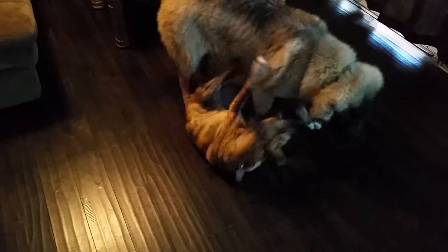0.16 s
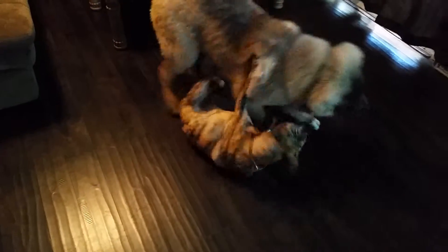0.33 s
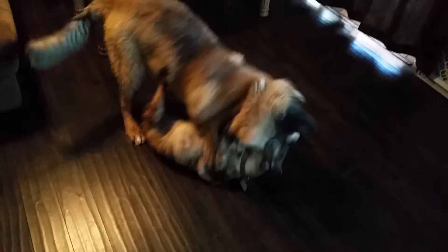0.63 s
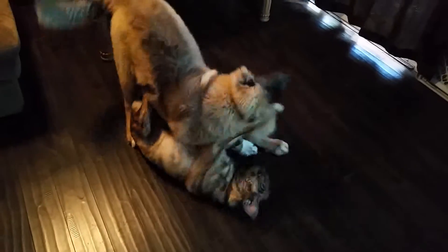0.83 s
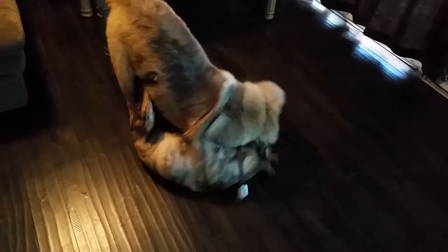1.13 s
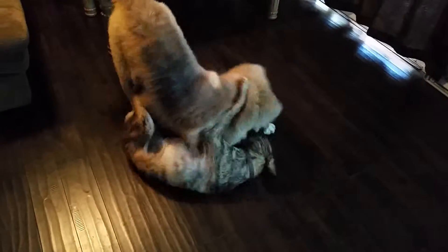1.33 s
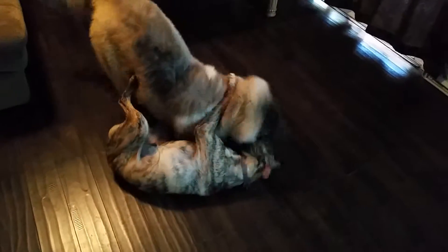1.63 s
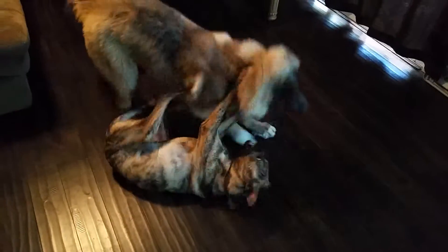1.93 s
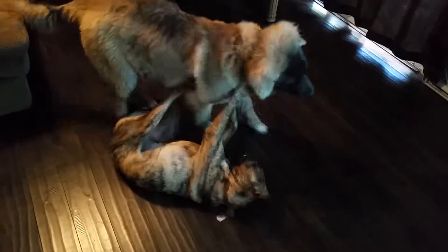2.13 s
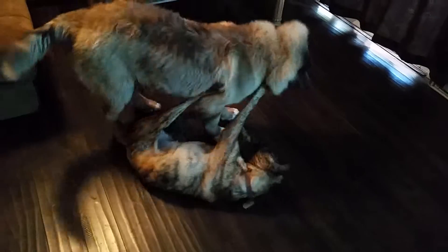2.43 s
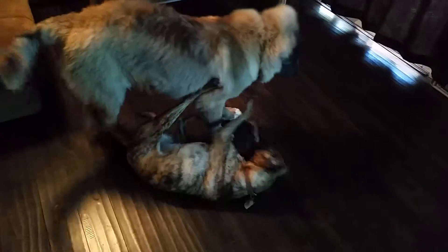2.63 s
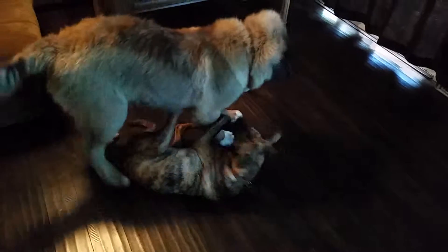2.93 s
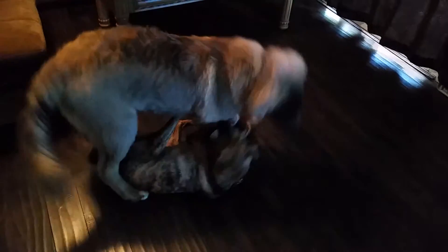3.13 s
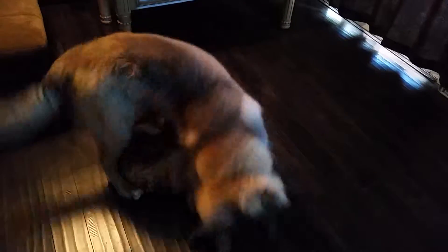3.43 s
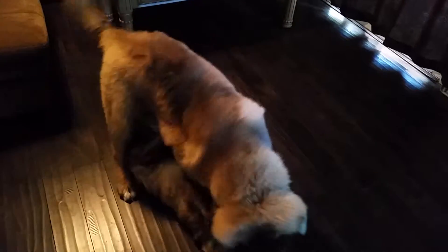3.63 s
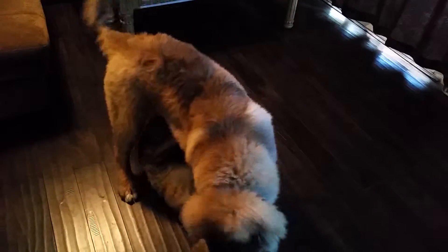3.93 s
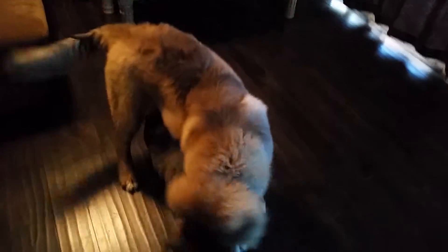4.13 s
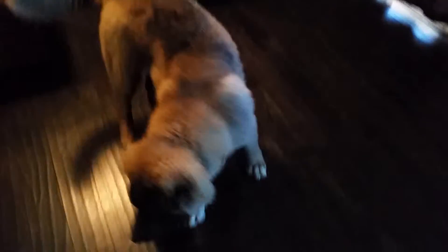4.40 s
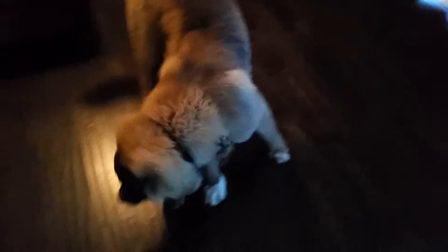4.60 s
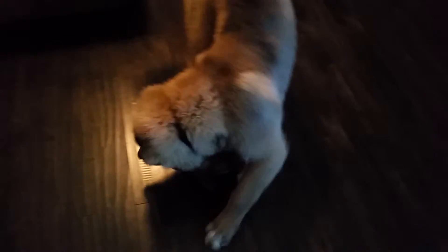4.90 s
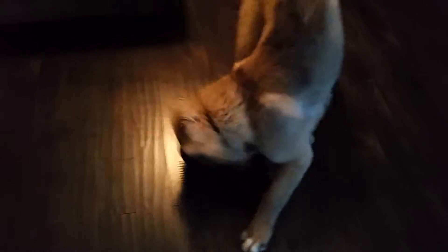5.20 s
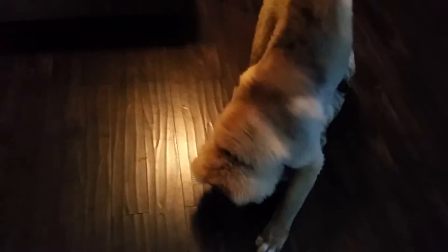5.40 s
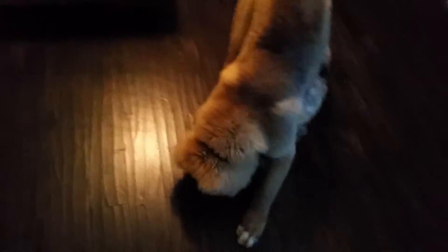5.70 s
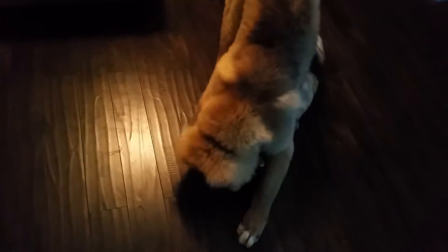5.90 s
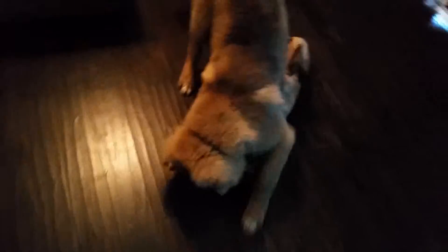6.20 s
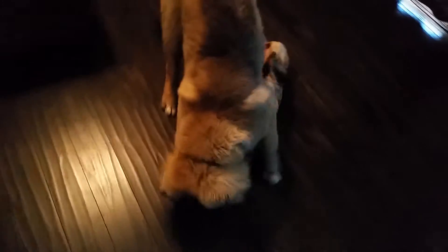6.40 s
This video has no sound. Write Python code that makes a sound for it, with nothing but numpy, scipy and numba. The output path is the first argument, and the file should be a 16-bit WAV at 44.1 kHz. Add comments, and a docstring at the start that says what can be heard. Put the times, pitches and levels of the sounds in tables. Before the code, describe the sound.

Close, throaty play growls and short grunts from scuffling dogs, with bright tag jingles, claw scrapes and soft body thumps on indoor floorboards.

```python
"""A metal collar tag jingles and claws tick, then rough growls and a grunt break out: two puppies wrestle on
a wooden floor in a living room, a metre or two from a hand-held phone. The voice is source and filter: uneven
pulses of the vocal folds ring chest, throat, a moving mouth and muzzle. The tag is a sum of decaying modes;
claws and bodies are short noise bursts that ring planks and boards. Room reflections, air and a low mains hum
surround them."""
import sys
import numpy as np
from scipy import signal
from scipy.fft import rfft, irfft
from scipy.io import wavfile
from scipy.ndimage import uniform_filter1d, map_coordinates
from numba import njit

SR = 44100
rng = np.random.default_rng(int(sys.argv[2]) if len(sys.argv) > 2 else 0)


def master_out(mix):
    """Clip the mix to full scale and print it as 16-bit PCM to the path in sys.argv[1]."""
    frames = np.transpose(np.atleast_2d(mix))
    ceiling = np.clip(frames, -1, 1)
    pcm = np.round(ceiling * 32767).astype(np.int16)
    wavfile.write(sys.argv[1], SR, pcm)


N = 288855
T = np.arange(N) / SR
FREQ = np.arange(N + 1) * SR / (2 * N)

# Hard catches in the throat, where the folds burst open. Each row: time in seconds, strength in dB.
CATCHES = [(.292, 5), (.45, 4), (1.04, 3), (1.068, 3), (1.696, 2), (2.68, 5), (2.732, 4.5), (2.891, 4),
           (3.223, 6), (4.131, 3), (4.224, 3), (4.381, 5.5), (4.524, 4.5), (5.144, 6), (5.268, 6),
           (5.751, 5), (5.856, 3), (6.002, 3.5), (6.078, 3), (6.11, 4)]
# Spectrum of a bare, bright contact. Each row: frequency in Hz, level in dB.
BRIGHT_CONTACT = [(1500, 7), (4000, 10), (7000, 24.5), (8700, 14.5), (11000, 21.5), (14000, 19),
                  (16000, 25)]


def undb(db):
    """Level as a logarithmic ratio: decibels to amplitude gain."""
    return 10 ** (np.asarray(db) / 20)


def unit(x):
    """Normalisation of power: scale to rms 1."""
    return x / np.sqrt(np.mean(x ** 2) + 1e-18)


def pan(db):
    """Interaural level difference: gains for a left minus right difference in dB."""
    return undb(np.array([[db], [-db]]) / 2)


def add(track, s, x):
    """Superposition: mix x into track from time s on."""
    i = max(int(s * SR), 0)
    track[..., i:i + x.shape[-1]] += x[..., :N - i]


def on_log_axis(points, hz):
    """Interpolation on a logarithmic frequency axis: read (Hz, value) points at the given frequencies."""
    f, value = np.transpose(points)
    return np.interp(np.log(hz + 1), np.log(f), value)


def colour(x, points, tilt_db=0):
    """Minimum-phase filter by cepstral folding: the given spectrum, tilted in dB per octave about 2.9 kHz."""
    size = 2048
    hz = np.arange(size + 1) * SR / (2 * size)
    level_db = on_log_axis(points, hz) + tilt_db * np.log2((hz + 100) / 3000)
    cepstrum = irfft(np.log(undb(level_db)))
    # folding the cepstrum onto positive times makes the response causal
    cepstrum[1:size] *= 2
    cepstrum[size + 1:] = 0
    response = irfft(np.exp(rfft(cepstrum)))
    return signal.fftconvolve(x, response)[:len(x)]


@njit
def svf(x, hz, width):
    """State-variable resonator: a band-pass whose centre may move, gain 1 at the centre."""
    y, band, low = np.empty(len(x)), 0., 0.
    for i in range(len(x)):
        g, k = np.tan(np.pi * hz[i] / SR), width / hz[i]
        v = (band + g * (x[i] + 1e-18 - low)) / (1 + g * (g + k))
        band, low, y[i] = 2 * v - band, low + 2 * g * v, k * v
    return y


def resonate(x, modes, skirt=2.6):
    """Parallel modes of resonance; a second pass, skirt times as wide as the first, steepens the flanks."""
    flat = np.ones(len(x))
    total = 0
    for hz, width, db in modes:
        once = svf(x, hz * flat, 1. * width)
        total = total + undb(db) * svf(once, hz * flat, 1. * skirt * width)
    return total


def walk(rate, n):
    """Low-frequency random modulation: straight lines between Gaussian knots, rate knots a second."""
    knots = rng.standard_normal(1024)
    return 1.87 * np.interp(np.arange(n) / SR * rate, np.arange(len(knots)), knots)


def steady(x):
    """Envelope normalisation: even out the slow level, leaving the single pulses."""
    power = np.maximum(uniform_filter1d(x ** 2, 2000), 0)
    return x / np.sqrt(power + 1e-3 * np.mean(x ** 2))


def surge(t):
    """Pressure build-up and release, in dB: the throat closes briefly, then lets the dammed air go."""
    hold_s, release_s = .022, .032
    gain_db = 0
    for s, db in CATCHES:
        closing = -np.exp(-abs(t - s) / hold_s)
        release = .9 * np.exp(-abs(t - s) / release_s)
        gain_db = gain_db + db * np.where(t < s, closing, release)
    return uniform_filter1d(gain_db, size=64)


def folds(start, n, tone_hz, clean, waver=0.015, limp_db=1.0, breath=0.021, open_s=0.0062):
    """Irregular glottal source: slack folds slap shut once a cycle, strong and weak in turn, drifting between
    a locked tone and free flapping; a catch ends in one hard slap, and turbulence follows each slap."""
    shimmer_db, catch_slap_db = 4.8, 7
    lock_wander, lock_rate_hz = .2, 11
    jitter, free_scatter = 0.042, 0.2984  # in cycles: always present, and added as the folds flap freely
    chance = rng.standard_normal((256, 2))
    cycle = np.arange(len(chance))
    cycles = np.cumsum(tone_hz * (1 + waver * walk(22.32, n))) / SR
    cleanness = np.clip(clean + lock_wander * walk(lock_rate_hz, n), 0, 1)
    locked = np.interp(cycle, cycles, cleanness)
    slap_cycle = cycle + (jitter + free_scatter * (1 - locked) ** 2) * chance[:, 0]
    at = np.interp(slap_cycle, cycles, np.arange(n), right=n).astype(int)
    uneven_db = shimmer_db * (1.2 - locked) * np.minimum(chance[:, 1], 1.6)
    size = undb(uneven_db + limp_db * (-1) ** cycle)
    pulses = np.zeros(n)
    pulses[at[at < n]] = unit(size)[at < n]
    for s, _ in CATCHES:
        if 0 <= (s - start) * SR < n:
            pulses[int((s - start) * SR)] = undb(catch_slap_db)
    puffs = signal.lfilter([1], [1, -np.exp(-1 / (open_s * SR))], pulses)
    noise = rng.standard_normal(N)[:n]
    return pulses + breath * puffs * noise, (puffs + 0.17) * noise


def growl(course, start, end, depth_db, throat_db, mouth_db, hiss_db, hiss_tilt_db, mouth_hz, width,
          broad_width, throat_hz, throat_width, tone_hz, clean, edge_s=0.0038):
    """Source-filter voice: rough slaps ring chest, throat, mouth and the bared muzzle.
    The effort swells and sags, the lips move the snarl, and the jaw opens at the end."""
    # Chest resonances. Each row: frequency in Hz, first-pass width in Hz, level in dB before the depth slope.
    chest_modes = [(95, 30, -8), (150, 60, 0), (235, 70, -1)]
    # Throat resonances. Each row: multiple of the throat frequency, level in dB.
    throat_modes = [(1.002, 25), (1.269, 0)]
    # Muzzle resonances with the lips at rest. Each row: frequency in Hz, first-pass width in Hz, level in dB.
    snarl_modes = [(1258, 250, 11.5), (1602, 266, 11.8), (1628, 91, 5), (1975, 170, 10), (2102, 230, 2.5),
                   (2680, 170, 0.78)]
    # Air through the teeth. Each row: frequency in Hz, level in dB before the tilt.
    hiss_spectrum = [(1500, -26.5), (2600, 9), (3400, -4), (4500, 5), (5400, -2), (6500, 0.5), (7600, -3.5),
                     (9000, -7.5), (11000, -6.5), (13000, -10.5), (16000, -16)]
    # Faint tooth resonances before the lips move them. Each row: frequency in Hz, first-pass width in Hz,
    # level in dB.
    teeth_modes = [(3400, 600, -3), (6300, 600, -1), (8700, 1000, -1)]
    strain_per_db = .005  # share by which pitch and resonances of mouth and throat rise with effort
    jaw_open_s, jaw_lift = 0.07, 0.027  # time constant, and rise of the mouth resonance as a share
    broad_ratio, broad_db = 1.1, -4.5  # the mouth's broad resonance, relative to its sharp one
    tongue_shift, tongue_rate_hz = .03, 14
    chest_gain_db, snarl_gain_db = -0.5, -0.5
    snarl_rest_hz, spit_db = 1712, 6

    t = np.arange(0, end - start, 1 / SR)
    n = len(t)
    times, *controls = np.transpose(course)
    effort, chest_db, snarl_db, snarl_hz = (np.interp(start + t, times, control) for control in controls)
    strain = 1 + strain_per_db * uniform_filter1d(effort - effort.mean(), size=2000)
    open_hz = mouth_hz * strain * (1 + jaw_lift * np.exp((t - t[-1]) / jaw_open_s))
    pulses, air = folds(start, n, tone_hz * strain, clean)
    push = surge(start + t)
    jaw_hz = open_hz * (1 + 0.0067 * walk(25.05, n))

    # the loose walls of the throat add slow turbulence to the chest tone
    flutter = pulses + .03 * (1 - np.clip(clean, 0, 1)) * air
    sloped_chest = [(hz, w, db - depth_db * np.log2(hz / tone_hz)) for hz, w, db in chest_modes]
    chest = resonate(flutter, sloped_chest, skirt=0.67)
    voice = steady(chest) * undb(chest_gain_db + chest_db + 0.13 * push)

    # the tongue shifts the throat's resonances, and they rise as the mouth opens
    tongue_hz = throat_hz * open_hz / mouth_hz * (1 + tongue_shift * walk(tongue_rate_hz, n))
    moved_throat = [(tongue_hz * ratio, throat_width, db) for ratio, db in throat_modes]
    throat = resonate(pulses, moved_throat, skirt=0.72)
    voice += steady(throat) * undb(throat_db + effort + 0.2 * push)

    mouth_modes = [(jaw_hz, width, 0), (jaw_hz * broad_ratio, broad_width, broad_db)]
    mouth = resonate(pulses, mouth_modes, skirt=1.04)
    voice += steady(mouth) * undb(mouth_db + effort + push)

    # drawing the lips back shortens the muzzle and lifts its resonances
    muzzle = snarl_hz / snarl_rest_hz * (1 + 0.016 * walk(10.3, n))
    moved_snarl = [(hz * muzzle, w, db) for hz, w, db in snarl_modes]
    rasp = resonate(pulses + 0.09 * air, moved_snarl, skirt=1.07)
    voice += steady(rasp) * undb(snarl_gain_db + snarl_db + push / 2)

    # air hisses past the wet teeth in time with the slaps, broad and grainy
    spit = undb(spit_db * rng.standard_normal(N)[:n])
    hiss = colour(air * spit, hiss_spectrum, hiss_tilt_db)
    lips = np.sqrt(muzzle)
    hiss += resonate(hiss, [(hz * lips * (1 + .015 * walk(20, n)), w, db) for hz, w, db in teeth_modes])
    voice += steady(hiss) * undb(snarl_db + hiss_db + push / 2)
    return voice * np.clip(np.minimum(t, t[-1] - t) / edge_s, 0, 1)


def dogs():
    """Antiresonance: side branches of nose and cheeks cut notches into all growls."""
    # Growls. Each row: start in seconds, end in seconds, fall of the chest in dB per octave, throat in dB
    # re effort, mouth in dB re effort, hiss in dB re snarl, hiss tilt in dB per octave, mean mouth resonance
    # in Hz before the jaw opens, its sharp and broad first-pass widths in Hz, mean throat resonance in Hz
    # before the jaw opens, its first-pass width in Hz, mean pitch in Hz, mean cleanness from 0 to 1.
    growls = [(0.256, 0.737, -1.5, -15.5, 1, -10.5, -1.5, 684, 33.7, 500, 530, 200, 232.1, 0.31),
              (1.015, 1.391, -5.5, 0, 2, -9, -4.5, 722, 92.9, 261, 416, 233, 226.1, 0.17),
              (1.693, 2.04, -4, -3, -1, -7.5, -1, 772, 49.5, 232, 423, 170.3, 217.8, 0.55),
              (2.509, 3.28, 3, -7.5, -3, -12, -2, 696, 37.4, 207, 462.2, 114, 228.1, .7),
              (3.369, 3.399, -3, -16, -1.5, 1, 3, 794, 227, 250, 458, 120, 129.4, 1),
              (3.519, 3.753, 0, -5.5, -1.5, -7, -2, 724, 43, 161, 508, 185, 160.2, 0.06),
              (4.127, 4.602, 2, -17.5, -2, -4, 0, 787, 81.5, 230, 408, 110, 200.2, 0.13),
              (4.956, 5.363, 2, -5.5, -2, -0.5, 1.5, 768, 80, 230, 452, 80, 221.9, 0.2),
              (5.67, 6.19, 7.5, -9.5, -5, -8.5, -3, 755, 60.4, 295, 437, 92, 217.8, 0.43)]
    # Course of each growl. Each row: time in seconds, effort (level of throat and mouth) in dB, chest level
    # in dB, snarl level in dB, all before trims and catches, snarl resonance in Hz.
    courses = [
        [(0.259, -31, -28, -46, 1710), (0.291, -23.5, -19, -47, 1700), (0.341, -18, -20.5, -28.5, 2150),
         (0.439, -19, -23.5, -33, 1840), (0.451, -22, -21, -28, 1844), (0.515, -23, -21, -28, 1700),
         (0.553, -14.5, -19, -22, 2010), (0.617, -52, -29, -50, 1800), (0.637, -21.5, -22.5, -44, 1830),
         (0.681, -19, -20, -20.5, 2180), (0.742, -29.5, -21.5, -34, 1870)],
        [(1.014, -34.5, -24, -33, 1710), (1.04, -31.5, -25, -39, 1630), (1.074, -27.5, -23.5, -30, 1670),
         (1.13, -31.5, -26, -33, 1590), (1.194, -31, -21.5, -34, 1830), (1.228, -27, -27, -30, 1824),
         (1.358, -27.5, -26, -35, 1730), (1.378, -39, -37, -36, 1800)],
        [(1.692, -37.5, -36, -46, 1860), (1.722, -33.5, -23.5, -36.5, 1670), (1.77, -23.5, -20, -29.5, 1910),
         (1.818, -28, -21.5, -44, 1720), (1.836, -35, -22, -36, 1640), (1.902, -35.5, -33, -41, 1720),
         (1.934, -29, -19, -32.5, 1690), (2.01, -31, -29.5, -34.5, 1720), (2.043, -41, -44, -33, 1680)],
        [(2.509, -34.5, -29, -47, 1786), (2.521, -26, -22, -40, 1700), (2.559, -17.5, -17.5, -23, 1636),
         (2.675, -25, -30, -30, 1465), (2.767, -20, -19.5, -31, 1450), (2.795, -28.5, -16.5, -40, 1726),
         (2.853, -22, -33, -31.5, 1816), (2.899, -25.5, -19.5, -33.5, 1780), (2.995, -19.5, -27.5, -37, 1544),
         (3.081, -27, -20, -33, 1612), (3.133, -19.5, -19, -37.5, 1544), (3.201, -26, -24.5, -29, 1564),
         (3.241, -20.5, -17.5, -34, 1610), (3.269, -31, -28.5, -20.5, 1644), (3.284, -35, -19, -42, 1790)],
        [(3.374, -27.5, -40, -35.5, 2100), (3.4, -33, -44, -58, 2080)],
        [(3.518, -38, -17, -44, 1927), (3.536, -17.5, -27, -40, 1850), (3.572, -21, -13.5, -27, 2030),
         (3.636, -19, -19.5, -27, 2027), (3.688, -23, -22, -30, 1680), (3.745, -37.5, -26, -29, 1570)],
        [(4.125, -37.5, -39, -44, 1760), (4.135, -25.5, -27, -41.5, 1690), (4.159, -31.5, -33, -44, 1630),
         (4.185, -18.5, -22.5, -36, 1620), (4.257, -28, -29, -34, 1750), (4.281, -19, -22, -35, 1990),
         (4.367, -21.5, -20.5, -33.5, 1670), (4.389, -17, -19.5, -30.5, 1670), (4.559, -19, -23.5, -31, 1830),
         (4.596, -29.5, -19.5, -35, 1850)],
        [(4.957, -42.5, -24, -66, 1800), (4.983, -23.5, -16.5, -43, 2000), (5.029, -24, -23.5, -40.5, 1770),
         (5.077, -23.5, -26, -41.5, 1710), (5.169, -22, -15, -40.5, 2160), (5.213, -19.5, -41, -39.5, 2150),
         (5.229, -21, -27, -33, 2120), (5.289, -24.5, -20.5, -38, 2230), (5.356, -24.5, -22.5, -39, 2260)],
        [(5.669, -39.5, -23, -36, 2070), (5.703, -31, -44, -47, 2100), (5.741, -21, -23, -60, 1670),
         (5.759, -17.5, -27, -37, 1530), (5.919, -21, -25.5, -37, 1790), (6.075, -20.5, -24, -36, 1640),
         (6.103, -23, -31, -58, 1760), (6.111, -15.5, -28, -42, 1670), (6.161, -26.5, -15.5, -32, 1760),
         (6.191, -19.5, -36.5, -37, 1800)],
    ]
    # Notches between the resonances. Each row: frequency in Hz, level in dB.
    notches = [(250, 0.5), (310, -6.5), (370, 6.5), (980, 1.5), (1120, -8.5), (1260, -5), (1480, 1.5),
               (2300, 3.5), (2600, -5), (3200, 2.5)]
    out = np.zeros(N)
    for course, row in zip(courses, growls):
        add(out, row[0], growl(course, *row))
    return pan(0.23) * colour(out, notches)


def contact(length_s, grain_db=5.5):
    """Stick-slip friction: a first tick and a dying run of tiny slips, with a decay of at least 1 ms."""
    size = 8192
    grain = undb(grain_db * rng.standard_normal(size))
    slips = rng.standard_normal(size) * grain * np.exp(-T[:size] / max(length_s, 1e-3))
    slips[0] += 5
    return slips


def blow(x, db):
    """Impact energy: scale a short sound to the energy of 5 ms at the given rms level."""
    return x * undb(db) * np.sqrt(SR / 200 / np.sum(x ** 2))


def tag_knocks():
    """Repeated impact: in each shake the tag knocks as it swings, lands with a clack and rebounds softly.
    Gives rows of time in seconds and high, middle, low and clack levels in dB."""
    # Shakes of the collar tag. Each row: start in seconds, length of the rattle in seconds, levels of high,
    # middle and low modes in dB, closing clack in dB, all before trims.
    shakes = [(0.0277, 0.015, -14, -18, -33.5, -48), (.113, 0.0013, -16, -18, -42, -46),
              (0.194, 0.002, -3, -18.5, -31.5, -46), (.3033, 0.0039, -22, -57, -40, -48.5),
              (0.5731, 0.062, -5, -17, -31.5, -45), (0.824, 0, -6.5, -18, -36, -26),
              (0.893, 0.0005, -17, -30, -29.5, -36), (0.925, 0, -7, -40, -36, -36),
              (0.938, 0.0046, -15, -45, -40, -23), (1.171, 0.01, -21, -38, -38, -41),
              (1.306, 0.03, -16.5, -27.5, -31.5, -42.5), (1.362, 0.0051, -10, -41, -31, -22.5),
              (2.0297, 0.029, -18, -34, -36, -36.5), (2.132, 0.056, -20.5, -23, -39.5, -43.5),
              (2.2518, 0.0074, -2.5, -13.5, -29, -21.5), (2.415, 0.027, -16, -36, -33, -49),
              (2.464, 0.01, -5.5, -24.5, -20, -38), (2.788, 0, -14.5, -33, -37, -39),
              (2.9812, 0, -13.5, -31, -36.5, -37.5), (3.26, 0, -24.5, -47, -48.5, -43),
              (3.455, 0.041, -3.5, -17.5, -36, -19.5)]
    gap_s, swing_ring_db, swing_clack_db = .03, -3, -23  # swing levels re the landing
    rebound_s, rebound_db = 0.072, -16  # delay before its random factor of 0.5 to 1.5
    knocks = []
    for (s, length_s, *ring, clack), luck in zip(shakes, rng.random(32)):
        land_s = s + length_s
        soft_clack = clack + swing_clack_db
        count = max(int(np.ceil(length_s / gap_s)), 0)
        for at in np.linspace(s, land_s, count, endpoint=False):
            knocks.append((at, *np.add(ring, swing_ring_db), soft_clack))
        knocks.append((land_s, *ring, clack))
        rebound = np.add([*ring, soft_clack], rebound_db)
        knocks.append((land_s + rebound_s * (.5 + luck), *rebound))
    return knocks


def tag_rings(knocks, low_db=-1, high_db=-6, rise_s=0.00019):
    """Modal vibration of a plate: each knock restarts the tag's modes where it exceeds what still rings;
    chatter against the split ring blurs every mode, and each flutters as the tag twirls."""
    # Modes of the tag. Each row: frequency in Hz, level in dB before the tone gain.
    modes = [(4683, -45), (6266, -61), (6395, -48), (7052, -55), (7504, -59), (7913, -47), (9948, -53),
             (10837, -51), (11440, -51), (12312, -64), (13227, -48), (13361, -54), (13727, -60),
             (14384, -57), (14508, -60), (15079, -52), (15488, -61)]
    # Tone of the tag. Each row: frequency in Hz, gain in dB.
    tone = [(4700, 0.5), (6400, 3), (8000, -4), (10000, -6), (11500, -16), (13500, -5.5), (15500, -1.5)]
    # Decay. Each row: frequency in Hz, time to fall 60 dB in seconds.
    decay = [(4700, .25), (8000, .27), (15000, .19)]
    # Stereo position. Each row: frequency in Hz, left minus right in dB.
    position = [(4700, 12.5), (6400, 10.5), (8000, 0.5), (11000, -13), (15000, -5.5)]
    blur_hz, spread_db, middle_hz, high_hz = 16, 2.5, 6700, 8800
    twirl_db, twirl_rate_hz = 2.8, 38
    out, t = np.zeros((2, N)), T[:SR // 2]
    total = np.sqrt(sum(undb(2 * db) for _, db in modes) / 4)
    for hz, db in modes:
        fade = np.exp(-np.log(1000) * t / on_log_axis(decay, hz)) * (1 - np.exp(-t / rise_s))
        swing = np.zeros(N)
        for (s, high, middle, low, clack), luck in zip(knocks, rng.standard_normal(64)):
            part = slice(int(s * SR), int(s * SR) + len(t))
            if hz > high_hz:
                knock_db = high + high_db
            else:
                knock_db = (middle if hz > middle_hz else low) + low_db
            # a tag pressed against floor or fur clacks hard and rings little
            choke_db = np.clip(clack - high + 26, 0, 9)
            struck = undb(knock_db - choke_db + spread_db * luck) * fade
            swing[part] = np.maximum(swing[part], struck)
        swing *= undb(twirl_db * np.clip(walk(twirl_rate_hz, N), -3, 1.5))
        # a random walk of the phase widens the spectral line
        drift = np.cumsum(rng.standard_normal(N)) * np.sqrt(2 * np.pi * blur_hz / SR)
        phase = 2 * np.pi * hz * T + drift + rng.uniform(0, 2 * np.pi, (2, 1))
        gain = undb(db + on_log_axis(tone, hz)) / total
        out += gain * pan(on_log_axis(position, hz)) * (swing * np.sin(phase))
    return out


def tag_clacks(knocks, clink_db=11):
    """Contact noise of an impact: bare metal of the tag against its ring."""
    out = np.zeros(N)
    for s, *_, db in knocks:
        add(out, s, blow(colour(contact(length_s=0.0011), BRIGHT_CONTACT), db + clink_db))
    return out


def claws(claw_db=2, skid_db=9, knock_db=1):
    """Impact and friction: claws tap and scrape, the plank under the paw rings, thin skids run on varnish."""
    # Claws and paw pads on the boards. Each row: time in seconds, level in dB before the trim, brightness
    # in dB per octave, decay of the scrape in seconds, knock of the plank in dB before the trim.
    touches = [(0.023, -15.5, 0.5, 0.0015, -34), (0.5726, -13.5, 8, 0.0016, -30),
               (.585, -35, 7, 0.0024, -16), (0.821, -16.5, 9, 0.0027, -26), (0.8246, -20.5, 3.5, .002, -34),
               (0.835, -33, 11, 0.0026, -21.5), (0.844, -25, 5.5, 0.001, -31),
               (0.8932, -19.5, 12, 0.001, -42), (0.926, -27, 0, 0.0034, -52),
               (1.3597, -22.5, 8, 0.0019, -32), (2.134, -23.5, -0.5, 0.12, -43),
               (2.359, -35, 8, 0.086, -59), (2.463, -27, 2, 0.0024, -31), (3.456, -20.5, 8.5, 0.0015, -44),
               (3.493, -23.5, 7, 0.0018, -39), (4.001, -25, 16, 0.0062, -37), (4.021, -25, 2.5, 0.014, -43),
               (5.532, -29, 6, .04, -41), (5.5799, -22.5, 3, 0.0015, -37), (5.587, -18.5, 4.5, 0.0013, -47),
               (5.598, -23, 5, .002, -47), (6.349, -44, -10, 0.12, -51)]
    # Claw spectrum. Each row: frequency in Hz, level in dB before the brightness tilt.
    claw_spectrum = [(200, 4), (600, 5), (1100, 4.5), (1600, 10.5), (2300, 10), (3300, 5.5), (4500, 3.5),
                     (6500, -16), (10000, -26), (16000, -67)]
    # Modes of a floor plank. Each row: frequency in Hz, first-pass width in Hz, level in dB.
    plank_modes = [(200, 26, 2.5), (324, 27, 6.5), (510, 110, -1), (722, 140, 2), (1115, 105, 0.5),
                   (1617, 55, -2.5)]
    # Skids of a claw. Each row: time in seconds, level in dB before the trim, decay in seconds.
    skids = [(4.038, -28, 0.075), (5.5264, -33.5, 0.0022), (5.542, -24.5, 0.012)]
    out = np.zeros(N)
    for s, db, tilt_db, length_s, plank_db in touches:
        touch = contact(length_s)
        add(out, s, blow(colour(touch, claw_spectrum, tilt_db), db + claw_db))
        add(out, s, blow(resonate(touch, plank_modes, skirt=6.1), plank_db + knock_db))
    for s, db, length_s in skids:
        add(out, s, blow(colour(contact(length_s), BRIGHT_CONTACT), db + skid_db))
    return out


def rakes():
    """Coarse stick-slip friction: claws rake hard across the boards in short, crackling bursts."""
    # Rakes. Each row: time in seconds, level in dB, decay in seconds.
    strokes = [(0.573, -17, 0.014), (5.577, -15.5, 0.03)]
    # Rake spectrum. Each row: frequency in Hz, level in dB.
    rake_spectrum = [(300, -14), (900, -17), (1300, -11), (1700, -4), (2200, -.5), (3000, 0), (4200, -5),
                     (6500, -15), (8000, -25), (16000, -35)]
    out = np.zeros(N)
    for s, db, length_s in strokes:
        slips = contact(length_s, grain_db=7)
        add(out, s, blow(colour(slips, rake_spectrum), db))
    return out


def floor_noises(thud_db=4, patchy_db=1.5):
    """Forced resonance and friction: soft weight booms the boards; fur and paws rub in uneven strokes."""
    # Bodies and paws on the boards. Each row: time in seconds, level in dB before the trim.
    thuds = [(3.117, -35), (3.347, -54), (3.51, -22.5), (5.046, -29), (6.1, -38)]
    # Modes of the boards. Each row: frequency in Hz, first-pass width in Hz, level in dB.
    board_modes = [(32.6, 15, -1), (52, 25, -43), (89, 9.1, -23), (166, 140, -19)]
    # Course of the rubbing. Each row: time in seconds, level in dB.
    rubbing = [(0, -46), (.8, -51), (.97, -41), (1.65, -45.5), (2.15, -38), (2.4, -49), (3.37, -35.5),
               (3.9, -42.5), (4.1, -44), (4.9, -44), (5.6, -40), (6.55, -42.5)]
    # Fur spectrum. Each row: frequency in Hz, level in dB.
    fur_spectrum = [(88, -82), (150, 0.5), (414, -7), (448, -4.5), (854, -2), (923, -11.5), (998, -9),
                    (1100, -10), (2500, -13.5), (3100, -24), (5360, -40), (9080, -26), (16000, -32.5)]
    strokes = undb(patchy_db * np.clip(walk(28, N), -2, 1))
    rub = unit(colour(rng.standard_normal(N), fur_spectrum) * strokes)
    out = rub * undb(np.interp(T, *np.transpose(rubbing)))
    for s, db in thuds:
        add(out, s, blow(resonate(contact(length_s=0.0028), board_modes), db + thud_db))
    return out


def two_ports(mid, side, apart_hz=1050):
    """Diffuse-field coherence at two close microphones: alike in the bass, unrelated in the treble."""
    likeness = .95 * np.sinc(np.minimum(FREQ / apart_hz, 2))
    m = irfft(rfft(mid, 2 * N) * np.sqrt(1 + likeness))[:len(mid)]
    s = irfft(rfft(side, 2 * N) * np.sqrt(1 - likeness))[:len(side)]
    return np.array([m + s, m - s]) / np.sqrt(2)


def room_tail(gap_s=0.003, build_s=0.0012):
    """Reverberation: dense reflections from floor, walls and furniture decay at a rate set by frequency."""
    # Decay of the room. Each row: frequency in Hz, time to fall 60 dB in seconds.
    decay = [(100, 0.48), (300, 0.22), (700, 0.46), (2000, 0.38), (5000, 0.48), (10000, 0.27),
             (16000, 0.18)]
    size = 32768
    t, hz = T[:size], np.arange(size // 2 + 1) * SR / size
    centres = np.geomspace(60, 16000, 9)
    noise, tail = rfft(rng.standard_normal((2, size))), 0
    for share, t60 in zip(np.eye(len(centres)), on_log_axis(decay, centres)):
        fade = np.exp(-np.log(1000) * t / t60) * np.clip((t - gap_s) / build_s, 0, 1)
        band = irfft(noise * on_log_axis(np.c_[centres, share], hz))
        tail = tail + band * fade / np.sqrt(np.sum(fade ** 2))
    return two_ports(*tail)


def in_room(x, tail, wet_db):
    """Direct plus reverberant field: add reflections at roughly unchanged power."""
    x = x * np.ones((2, 1))
    reflections = signal.fftconvolve(x, tail, axes=1)[:, :N]
    return (x + undb(wet_db) * reflections) / np.sqrt(1 + undb(2 * wet_db))


def background(air_db=-53, hum_hz=119.7):
    """Diffuse noise and a standing wave: still room air and the wavering mains hum of an appliance."""
    # Air spectrum. Each row: frequency in Hz, level in dB.
    air_spectrum = [(12, -81), (20, 17), (123, 4), (590, -25), (738, -9), (1290, -31), (1710, -8),
                    (4300, -3), (5380, -6), (6540, 1), (16000, -67)]
    # The hum swells and sinks as the phone moves through its standing wave.
    # Each row: time in seconds, level in dB before the random waver.
    hum_course = [(0, -45.5), (1.62, -54), (2.4, -44), (3.95, -47.5), (4.85, -43.5), (6.5, -42.5)]
    air = two_ports(*(unit(colour(rng.standard_normal(N), air_spectrum)) for _ in range(2)))
    tone = unit(np.sin(2 * np.pi * hum_hz * T + 0.12 * walk(3.9, N)))
    hum = tone * undb(walk(6.7, N))
    return undb(air_db) * air + undb(np.interp(T, *np.transpose(hum_course))) * hum


def scene():
    """Superposition of sources: dogs, collar and floor share one reverberant room."""
    tail, knocks = room_tail(), tag_knocks()
    out = in_room(dogs(), tail, wet_db=1.0)
    out += in_room(tag_rings(knocks), tail, wet_db=0.5)
    out += in_room(tag_clacks(knocks), tail, wet_db=-0.5)
    out += in_room(claws(), tail, wet_db=6.5)
    out += in_room(rakes(), tail, wet_db=-13.0)
    out += in_room(floor_noises(), tail, wet_db=-2.0)
    return out + background()


def record(dry):
    """Two-port reception: the ports differ in colour, the left one is late or early as the phone turns,
    peaks are softly rounded and the top is cut above 16 kHz."""
    # Colour difference of the ports. Each row: frequency in Hz, left minus right in dB.
    port_colour = [(120, -3.5), (300, -2.5), (550, -1.2), (1000, 0.5), (2000, -5), (5000, 3)]
    # The phone turns. Each row: time in seconds, lag of the left port in samples.
    port_lag = [(0, 4), (3.7, 4.5), (4.2, -1), (5.3, -2), (5.8, 1), (6.3, 5)]
    balance = on_log_axis(port_colour, FREQ)
    gains = np.array([undb(balance / 2), undb(-balance / 2)])
    ports = irfft(rfft(dry, 2 * N) * gains)[:, :N]
    left_at = np.arange(N) - np.interp(T, *np.transpose(port_lag))
    ports[0] = map_coordinates(ports[0], [left_at], order=5, mode="mirror")
    rounded = ports / (1 + (ports / .85) ** 4) ** .25
    top_cut = signal.ellip(10, .2, 70, 16000, fs=SR, output="sos")
    return signal.sosfilt(top_cut, rounded)


dry = scene()
out = record(dry)
master_out(out)
```